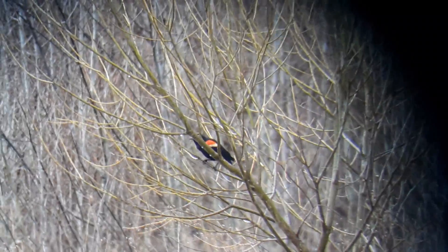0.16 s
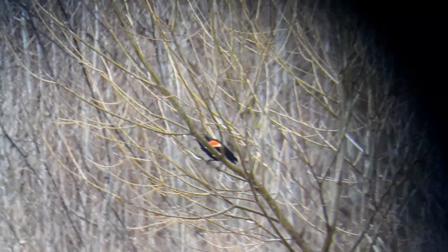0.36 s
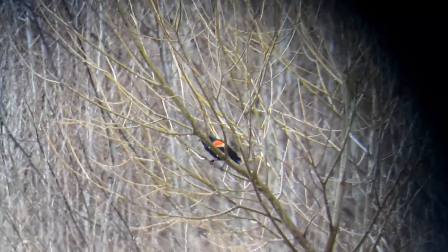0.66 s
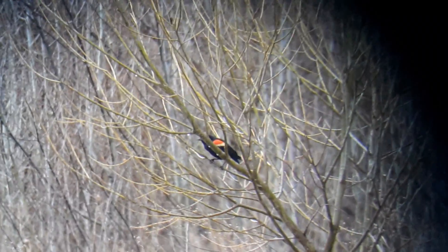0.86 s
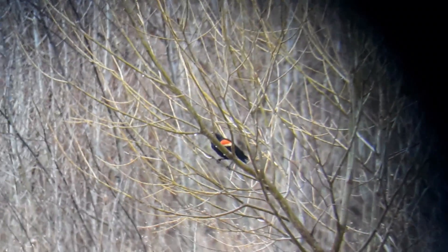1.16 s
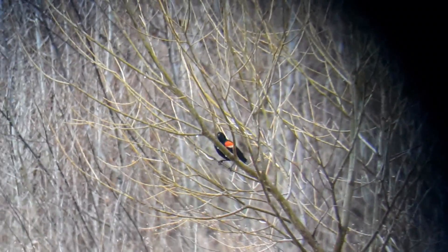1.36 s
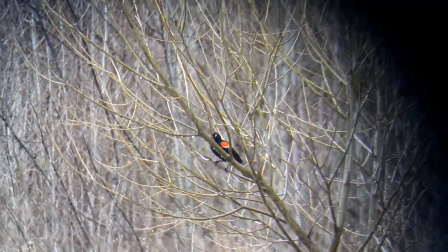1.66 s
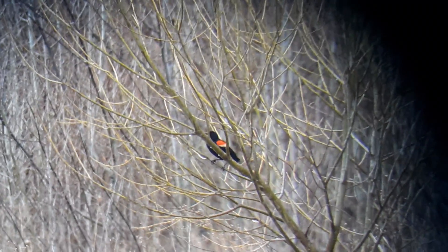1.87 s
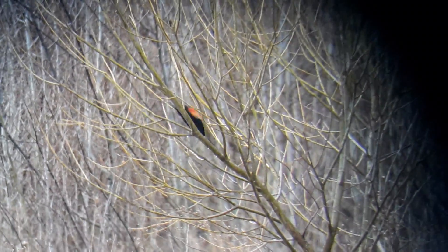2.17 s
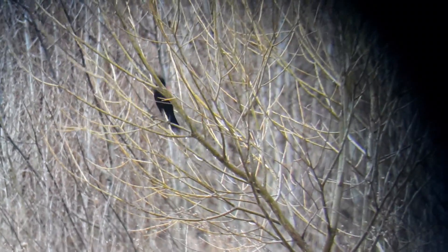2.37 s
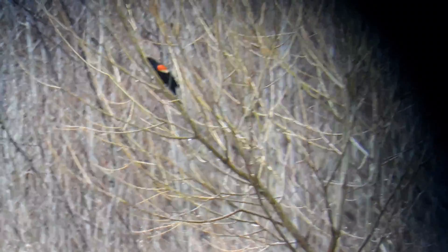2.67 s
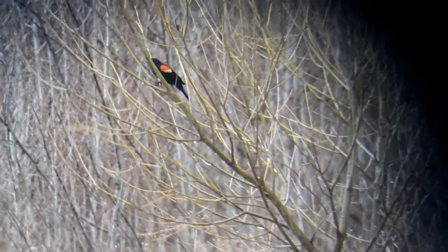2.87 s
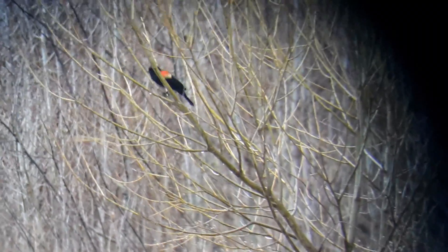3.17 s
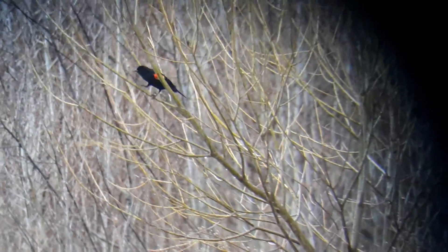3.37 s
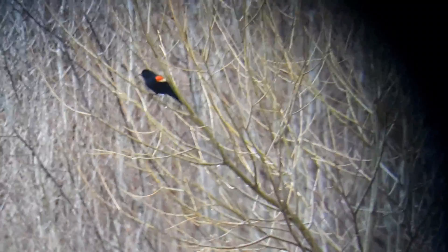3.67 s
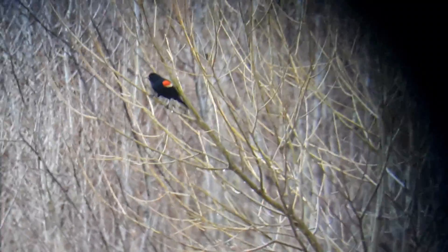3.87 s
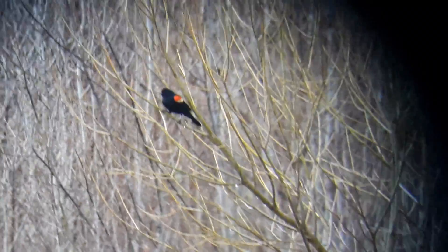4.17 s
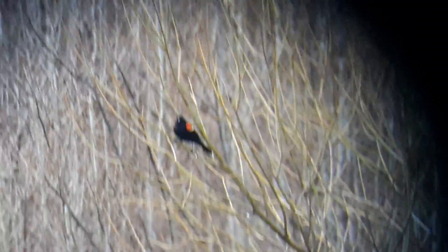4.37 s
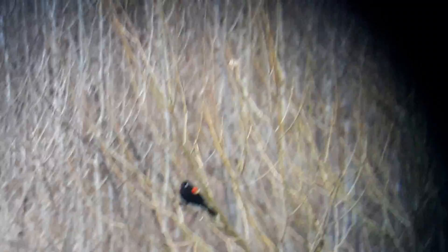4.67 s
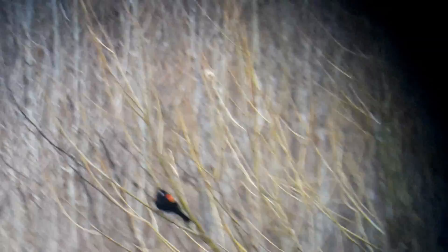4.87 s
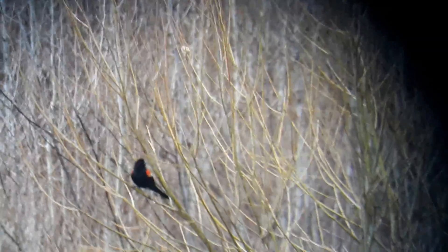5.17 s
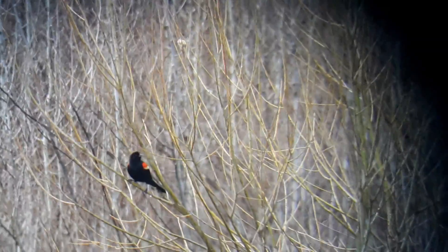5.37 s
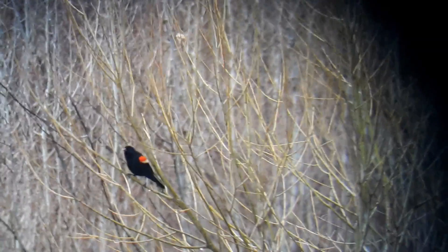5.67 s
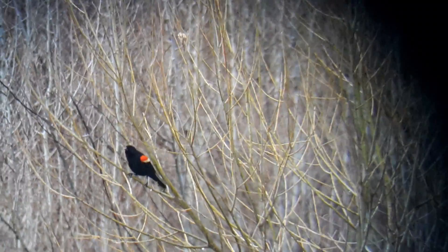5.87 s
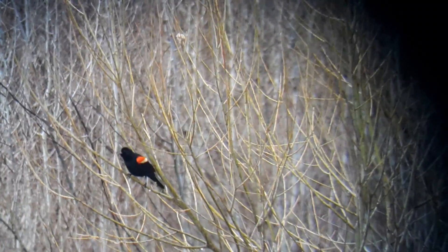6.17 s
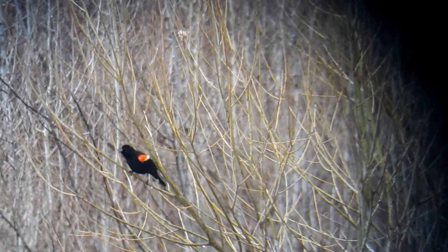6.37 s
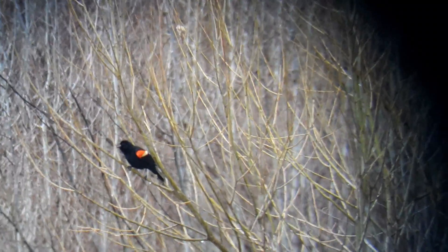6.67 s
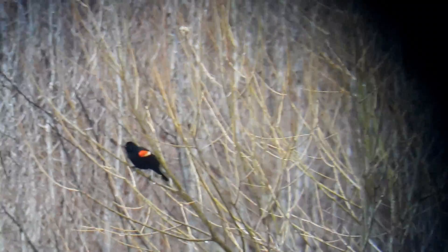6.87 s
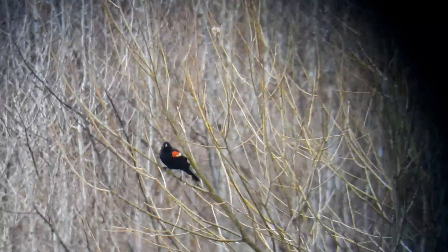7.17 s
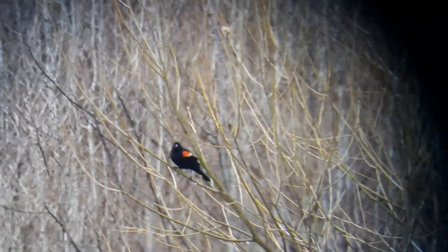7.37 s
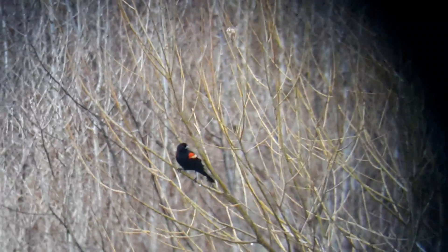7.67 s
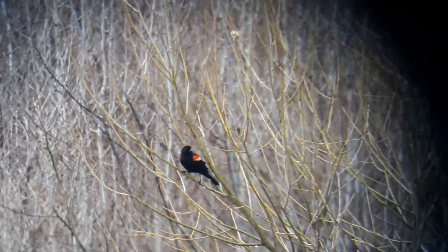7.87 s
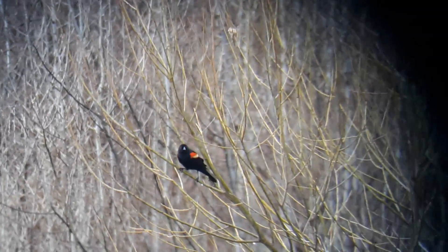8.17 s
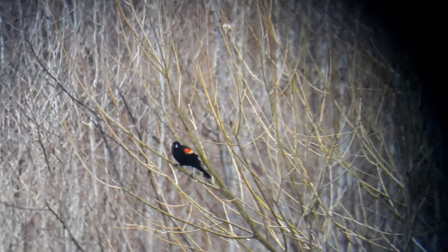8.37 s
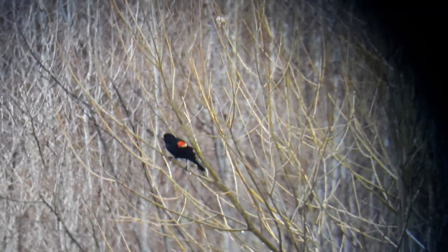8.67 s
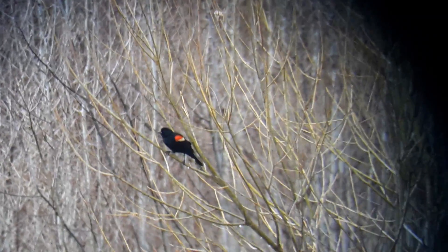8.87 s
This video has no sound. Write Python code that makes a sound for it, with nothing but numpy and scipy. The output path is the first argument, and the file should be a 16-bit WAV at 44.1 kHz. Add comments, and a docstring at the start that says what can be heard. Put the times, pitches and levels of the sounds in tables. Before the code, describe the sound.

Blackbirds sing short whistled notes and buzzy trills over a constant high-pitched whine, while a hand occasionally knocks the microphone.

```python
"""Blackbirds by a marsh

Red-winged blackbirds sing in bare trees: a few whistled notes, then a long trill made by both sides of
the syrinx, a bird's voice box. Chucks, thin whistles and a small songbird's ticking pass between songs.
Under it all lie a low rumble, a faint hiss and a steady whine, likely a far chorus of peeper frogs.
The hand-held microphone is bumped a few times, and its left side is shaded from the birds."""
import sys
import numpy as np
from scipy import signal
from scipy.fft import rfft, irfft, next_fast_len
from scipy.io import wavfile

SR = 44100
rng = np.random.default_rng(int(sys.argv[2]) if len(sys.argv) > 2 else 0)


def wrap_up_sound(samples):
    """Save the sound to the file named by the first command line argument, as 16-bit audio."""
    columns = np.atleast_2d(samples).T
    # keep every value between -1 and 1, then stretch to whole-number steps
    tamed = np.clip(columns, -1, 1)
    steps = np.round(tamed * 32767).astype(np.int16)
    wavfile.write(sys.argv[1], SR, steps)


N = 397341
TIME = np.arange(N) / SR

# Levels in these tables are starting points: filters and the mix change them later.
# The steady whine's tone. Each row: frequency in Hz, left and right level in dB.
WHINE_SPECTRUM = [(2110, -118, -116), (2230, -104, -102), (2466, -90.5, -86.5), (2622, -81, -78.5),
                  (2718, -74.5, -71.5), (2805, -86.5, -70), (3033, -81, -77), (3057, -104, -82.5),
                  (3360, -113, -108), (3650, -130, -125)]
# Level of the steady whine over time, with a brief rise during the loud trill.
# Each row: time in seconds, level in dB.
WHINE_LEVELS = [(0.0, -52), (1.93, -52), (2.28, -54), (2.53, -49.5), (2.8, -54), (4.86, -50.5),
                (4.89, -47.5), (5.34, -54.5), (5.39, -52), (8.05, -50.5), (8.65, -54), (9.0, -51.5)]
# The background noise's tone. Each row: frequency in Hz, left and right level in dB.
BACKGROUND_SPECTRUM = [(26.1, -95.5, -97.5), (85, -77.5, -75.5), (149, -81.5, -82), (217, -90, -89),
                       (372, -91, -89), (770, -100, -95.5), (1380, -109, -107), (2340, -109, -107),
                       (4100, -115, -109), (4800, -123, -117), (5900, -130, -128), (8460, -133, -134),
                       (10200, -121, -121), (12000, -118, -118), (15900, -121, -121)]
# Slow level changes of a low rumble and of a faint high background hiss.
# Each row: time in seconds, rumble in dB, hiss in dB.
BACKGROUND_LEVELS = [(0.0, -58.5, -80), (0.53, -58.5, -83.5), (2.58, -60.5, -84), (2.83, -61.5, -83.5),
                     (3.96, -59, -82), (4.23, -59, -82), (4.79, -58, -78), (5.94, -60.5, -84.5),
                     (6.74, -56.5, -78.5), (9.0, -61, -84.5)]
# Trills. Each row: start and length in seconds, kind, pulses per second, lower and upper voice in dB.
BLACKBIRD_TRILLS = [(-.2, 0.54, "buzz", 85, -72.5, -72), (-.1, 0.97, "purr", 25.6, -82.5, -77),
                    (1.901, 0.082, "buzz", 85, -75, -84), (2.595, 0.54, "buzz", 81.2, -67.5, -68),
                    (3.102, 0.66, "purr", 25.44, -73, -78.5), (4.296, .13, "rasp", 201.6, -65, -56),
                    (4.494, 0.555, "rattle", 47.8, -55, -44.5), (5.968, 1, "purr", 26.13, -76, -76),
                    (6.585, 0.51, "churr", 48.1, -63.5, -68.5), (7.529, .47, "buzz", 89, -52, -61),
                    (8.101, 0.53, "purr", 26.1, -73, -74.5)]
# The lower and upper voice of each kind. Each row: flutters per pulse, centre pitch in Hz,
# sweep in Hz, flutter size in Hz, about half of a pulse's level swing in dB.
TRILL_VOICES = {"rattle": [(7, 3450, 430, 520, 1.5), (6, 5000, 720, 140, 10.5)],
                "churr": [(4, 3230, 380, 130, 5.5), (2, 4700, 510, 446, 2)],
                "buzz": [(2, 3450, 380, 665, 2.5), (2, 4950, 130, 140, 1)],
                "purr": [(6, 3300, 300, 650, 1.5), (2, 5060, 65, 120, 1)],
                "rasp": [(1, 3600, 150, 360, 10.5), (1, 4920, 50, 88, 0.5)]}
# The beak favours the middle of a trill. Each row: frequency in Hz, gain in dB.
BEAK_FILTER = [(3200, 5), (3900, 2.5), (4280, -2), (4600, 6.5), (5600, -7), (6050, -18), (6600, 0),
               (7300, -39)]
# Runs of chirps. Each row: start in seconds, count, spacing in seconds, level in dB.
RISING_RUNS = [(.187, 3, 0.032, -65.5), (.581, 4, 0.031, -67), (2.935, 5, 0.022, -69),
               (5.207, 3, .026, -65), (5.679, 3, .022, -69)]
# Sharp chips. Each row: start in seconds, level in dB.
SHARP_CHIPS = [(.305, -61.5), (3.185, -56)]
# A chip's voice, laid out like one trill voice.
CHIP_SHAPE = (2, 4600, 350, 580, 1.8)
# The small songbird's songs. Each row: start in seconds, count, spacing in seconds, level in dB.
SONGBIRD_SONGS = [(.957, 7, .129, -71.5), (6.084, 6, .134, -78.5)]
# Its syllable: a tick, a falling note, a rising answer.
# Each row: delay and length in seconds, start, middle and end pitch in Hz, level in dB.
SONGBIRD_SYLLABLE = [(0, 0.0058, 5580, 6490, 7770, 4.5), (0.043, 0.033, 4605, 4230, 4080, -1.5),
                     (.08, .016, 3350, 3650, 4000, -8.5)]
# Whistles. Each row: start and length in seconds, middle pitch and fall in Hz, level in dB.
THIN_WHISTLES = [(1.714, 0.12, 1957, -34, -78.5), (1.997, .12, 5970, 591.5, -82.5),
                 (2.138, 0.17, 5530, 501.5, -81), (2.863, .03, 5700, 347, -79.5),
                 (3.26, 0.11, 4430, 199, -72.5), (3.651, .11, 4420, 197.5, -65),
                 (3.762, .096, 4605, 111, -69), (3.875, 0.2, 1208, 59, -70.5),
                 (4.078, 0.11, 4470, 173, -64), (4.146, 0.071, 4640, 120, -65.5),
                 (4.3, 0.15, 1540, -60.5, -74.5), (4.69, .13, 7400, 300, -89.5),
                 (5.905, .07, 2275, 97, -70), (8.098, 0.065, 4580, 139, -71),
                 (8.464, 0.074, 4470, 165, -66.5), (8.524, 0.078, 4500, 106, -73),
                 (8.758, 0.1, 4370, -4, -69), (8.935, .1, 4570, 151, -70)]
# Chucks. Each row: start in seconds, level in dB.
CHUCK_CALLS = [(2.343, -66.5), (4.049, -59.5), (6.47, -57), (8.704, -64)]
# A chuck's start, middle and end pitch in Hz.
CHUCK_PITCHES = (1540, 1787, 1550)
# The levels of its first four harmonics (multiples of the pitch) in dB.
CHUCK_HARMONICS = (-32.5, -0.5, -8, -37)
# The notes that open a song. Each row: start and length in seconds, start and end pitch in Hz, buzz
# depth as a share of the pitch, lowest tone in dB, overtones in dB, step per overtone in dB.
SONG_NOTES = [(2.478, 0.12, 1638, 1715, 0.04, -89, -54, -17),
              (3.151, 0.069, 1435, 1577, 0.07, -69, -59.5, -13),
              (4.207, 0.035, 2290, 2060, 0.06, -50.5, -73, 3),
              (4.291, .135, 2522, 2554, 0.01, -62, -51, -4), (4.3, 0.15, 1660, 1630, .04, -79, -59, -5),
              (4.45, .023, 1970, 1810, .04, -56.5, -67.5, 5.5),
              (4.488, 0.021, 1620, 1740, 0, -81.5, -53, -4.5),
              (6.301, 0.065, 2380, 2427, 0.05, -48.5, -89, -1),
              (6.392, 0.17, 2060, 2195, 0.01, -55, -73.5, -1.5),
              (6.527, 0.051, 1864, 1220, 0.2, -62, -63, -15), (7.182, .075, 1457, 1660, 0, -52, -78, -2),
              (7.257, 0.11, 1635, 1675, 0.02, -70, -61.5, 2.5),
              (7.455, 0.016, 2300, 2127, 0.05, -44.5, -66.5, 3),
              (7.477, 0.044, 2360, 2540, .03, -54, -56.5, -14),
              (7.661, 0.081, 1460, 1670, 0.06, -63.5, -62, -17),
              (7.998, 0.044, 2470, 2575, 0.01, -63, -63, -1)]
# What the throat passes of the overtones. Each row: frequency in Hz, gain in dB.
THROAT_FILTER = [(2900, 4.5), (3350, -3.5), (3750, -7.5), (4300, -17.5), (5050, 1.5), (5650, -7),
                 (6300, -4.5), (6700, -9), (7600, -33)]
# Shade on the microphone's left side. Each row: frequency in Hz, gain in dB.
LEFT_SHADE = [(1500, -8.5), (2700, -6), (3600, -19.5), (4200, -17.5), (5100, -19), (6500, -12.5),
              (7600, -35)]
# Hand bumps. Each row: start in seconds, peak in dB, left minus right in dB, treble cutoff in Hz.
HAND_BUMPS = [(3.667, -25.5, 28, 487), (4.477, -41.5, 26, 487), (5.45, -43.5, 12, 503),
              (6.858, -45.5, 12, 500), (6.891, -47, 19, 505), (6.932, -40, 21, 504)]
# How the microphone's case rings. Each row: pitch in Hz, level in dB, seconds to fade by 60 dB.
CASE_RINGS = [(85, -20, 1), (129.8, 2.5, 0.16), (162, 1.5, 0.13), (229, 0, 0.12), (379, -2.5, 0.044),
              (562, -5, 0.061), (845, -14.5, 0.032)]


def undb(db):
    """Turn decibels into a gain."""
    return 10 ** (np.asarray(db) / 20)


def unit(x):
    """Scale to an average (rms) level of 1."""
    return x / np.sqrt(np.mean(x ** 2) + 1e-20)


def add(out, start, x):
    """Mix x into out from a start time on."""
    i = int(start * SR)
    a, b = max(i, 0), min(i + x.shape[-1], N)
    out[..., a:b] += x[..., a - i:b - i]


def colour(x, hz, db):
    """Filter by a curve drawn through a few points."""
    size = next_fast_len(N)
    f = np.maximum(np.fft.rfftfreq(size, 1 / SR), 1)
    gain = undb(np.interp(np.log(f), np.log(hz), db))
    return irfft(rfft(x, size) * gain, size)[:N]


def walk(t, rate):
    """A random drift of size about 1 that turns rate times a second."""
    knots = rng.standard_normal(1024)
    return np.interp(t * rate % 1023, np.arange(1024), knots)


def fade(t, rise, fall):
    """Fade in and out; rise and fall are in seconds."""
    fade_in = np.sin(np.pi / 2 * np.clip(t / rise, 0, 1))
    return fade_in * np.sin(np.pi / 2 * np.clip((t[-1] - t) / fall, 0, 1))


def decay(t, t60):
    """Die away by 60 dB in t60 seconds."""
    return np.exp(-np.log(1000) * t / t60)


def glide(length, pitches):
    """Times and a pitch curve through start, middle and end."""
    t = np.arange(int(length * SR)) / SR
    return t, np.polyval(np.polyfit([0, .5, 1], pitches, 2), t / length)


def turn(hz):
    """The phase of a moving pitch."""
    return 2 * np.pi * np.cumsum(hz) / SR


def level_curves(curve):
    """Each level column over time, in dB from its median."""
    times, *columns = np.transpose(curve)
    return [np.interp(TIME, times, c - np.median(c)) for c in columns]


def white():
    """Plain noise."""
    return rng.standard_normal(N)


def stereo(sound, spectrum, shared, apart_hz, lag_s=0):
    """Two sides hear a sound, each with its own tone, and less and less alike above apart_hz."""
    hz, *sides_db = np.transpose(spectrum)
    alike = np.clip(shared / (1 + (hz / apart_hz) ** 2), 1e-4, .99)
    common = sound()
    arrivals = np.roll(common, int(lag_s * SR)), common
    sides = [colour(x, hz, db + 10 * np.log10(alike)) + colour(sound(), hz, db + 10 * np.log10(1 - alike))
             for x, db in zip(arrivals, sides_db)]
    return np.sqrt(SR / 2) * np.array(sides)


def peeps(count=300, single_db=-18, blur_db=-4):
    """Short rising peeps; noise stands for the many so far off that they blur together."""
    out = np.zeros(N)
    for when, pitch, size in rng.random((count, 3)):
        t, hz = glide(0.1005, (2520 + 480 * pitch) * np.array([.95, 1, 1.03]))
        add(out, when * (N / SR), np.sin(turn(hz)) * fade(t, 0.033, 0.042) * undb(9 * size))
    return undb(single_db) * unit(out) + undb(blur_db) * white()


def steady_whine():
    """Far peeps, likely frogs, merge into a whine."""
    level_db, = level_curves(WHINE_LEVELS)
    return stereo(peeps, WHINE_SPECTRUM, shared=0.43, apart_hz=12200, lag_s=-.00039) * undb(level_db)


def rumble_and_hiss(split_hz=1500):
    """A low rumble and a faint high background hiss, each drifting in level."""
    rumble_db, hiss_db = level_curves(BACKGROUND_LEVELS)
    noise = stereo(white, BACKGROUND_SPECTRUM, shared=1.0, apart_hz=176)
    rumble = signal.sosfiltfilt(signal.butter(2, split_hz, fs=SR, output="sos"), noise)
    hiss = noise - rumble
    return rumble * undb(rumble_db + 0.79 * walk(TIME, 9.1)) + hiss * undb(hiss_db + 0.7 * walk(TIME, 3.2))


def trill_voice(length, rate, shape, jitter_hz=130, overtone_db=-18, wander=.06):
    """One side of the syrinx sweeps once a pulse and flutters on top; early pulses are hurried and soft."""
    flutters, centre_hz, sweep_hz, flutter_hz, depth_db = shape
    t = np.arange(int(length * SR)) / SR
    hurry = 1 + .17 * np.exp(-(t / .15) ** 2)
    cycle = turn(rate * hurry) - 2 * np.pi * .94 + wander * walk(t, rate)
    flutter = flutters * cycle
    # the pitch climbs, plunges and recovers; the voice is loudest as the plunge begins
    pulse = np.exp(1.5 * (np.cos(cycle + .25) - 1))
    sweep = -np.sin(cycle) * np.exp(3.5 * (np.cos(cycle) - 1))
    swing = sweep_hz * sweep / sweep.max() + flutter_hz * np.cos(flutter)
    swing *= 1 + wander * walk(t, rate)
    # wide sweeps are less steady than narrow ones
    hz = centre_hz + swing + jitter_hz * np.tanh((sweep_hz + flutter_hz) / 600) * walk(t, 500)
    effort_db = 2 * np.sin(np.pi * (t / length) ** 1.4) + 1.6 * walk(t, 40)
    loudness = undb(2 * depth_db * pulse - 2.6 * np.sin(flutter) + effort_db)
    voice = np.sin(turn(hz)) + undb(overtone_db) * np.sin(2 * turn(hz))
    return unit(voice * loudness * fade(t, 0.032, 0.025))


def trills():
    """Both sides of a blackbird's syrinx sing at once, one low and one high."""
    out = np.zeros(N)
    for start, length, kind, rate, *levels_db in BLACKBIRD_TRILLS:
        for shape, db in zip(TRILL_VOICES[kind], levels_db):
            add(out, start, undb(db) * trill_voice(length, rate, shape))
    return out


def whistle(length, pitches, db, waver=.004, scatter_db=2.5):
    """One nearly pure tone, its level partly left to chance."""
    t, hz = glide(length, pitches)
    tone = np.sin(turn(hz * (1 + waver * walk(t, 150)))) * fade(t, .48 * length, .4 * length)
    return unit(tone) * undb(db + scatter_db * rng.standard_normal())


def series_call(length, pitches, db, k, count, arch_db=3, vary_db=2):
    """Call k of a series that swells in the middle; no two calls are quite alike."""
    swell_db = arch_db * (np.sin(np.pi * (k + .5) / count) - 2 / np.pi)
    varied_hz = np.array(pitches) * (1 + .014 * rng.standard_normal(size=3))
    return whistle(length, varied_hz, db + swell_db + vary_db * rng.standard_normal())


def chirp_runs(pitches_hz=(4500, 5000, 5730)):
    """Quick runs of tiny rising whistles."""
    out = np.zeros(N)
    for start, count, spacing, db in RISING_RUNS:
        for k in range(count):
            add(out, start + k * spacing, series_call(0.65 * spacing, pitches_hz, db, k, count))
    return out


def chips():
    """Short harsh bursts from one side of the syrinx."""
    out = np.zeros(N)
    for start, db in SHARP_CHIPS:
        add(out, start, undb(db) * trill_voice(length=0.03, rate=91, shape=CHIP_SHAPE))
    return out


def note(length, pitches, buzz_hz, depth, harmonics_db, waver=.002):
    """A gliding note with harmonics; a fast buzz of the syrinx shakes its pitch."""
    t, hz = glide(length, pitches)
    buzz = np.sin(2 * np.pi * buzz_hz * t)
    phase = turn(hz * (1 + depth * buzz + waver * walk(t, 160)))
    tone = sum(np.sqrt(2) * undb(db) * np.sin(k * phase) for k, db in enumerate(harmonics_db, 1))
    # a deep buzz also chops the level; a shallow one leaves a clean whistle
    chop = 1 + 0.25 * np.tanh(depth / 0.06) * buzz
    return tone * chop * fade(t, .3 * length, .22 * length)


def songbird_buzz(start=.846, length=.08, hz=6630):
    """A high buzzy note opens the small songbird's first song."""
    out = np.zeros(N)
    add(out, start, note(length, (hz, hz, hz), buzz_hz=212.5, depth=0.047, harmonics_db=[-54.5]))
    return out


def songbird_ticks():
    """The small songbird repeats a syllable of three brief whistles."""
    out = np.zeros(N)
    for start, count, spacing, db in SONGBIRD_SONGS:
        for k in range(count):
            for delay, length, *pitches, part_db in SONGBIRD_SYLLABLE:
                add(out, start + k * spacing + delay, series_call(length, pitches, db + part_db, k, count))
    return out


def thin_whistles():
    """Single whistles, most of them sliding down."""
    out = np.zeros(N)
    for start, length, hz, fall_hz, db in THIN_WHISTLES:
        add(out, start, whistle(length, (hz + .6 * fall_hz, hz, hz - .4 * fall_hz), db))
    return out


def chucks(length=.044):
    """Short, slightly buzzy calls that rise and fall in pitch."""
    out = np.zeros(N)
    for start, db in CHUCK_CALLS:
        chuck = note(length, CHUCK_PITCHES, buzz_hz=230, depth=.02, harmonics_db=CHUCK_HARMONICS)
        add(out, start, undb(db) * chuck)
    return out


def opening_notes(buzz_hz=180):
    """A blackbird's whistled notes; the throat shapes their three overtones."""
    out, steps = np.zeros(N), np.arange(3)
    for start, length, first_hz, last_hz, depth, db, overtones_db, tilt_db in SONG_NOTES:
        middle_hz = first_hz + .6 * (last_hz - first_hz)
        throat_db = np.interp(middle_hz * (steps + 2), *np.transpose(THROAT_FILTER))
        overtones = overtones_db + tilt_db * steps + throat_db
        add(out, start, note(length, (first_hz, middle_hz, last_hz), buzz_hz, depth, [db, *overtones]))
    return out


def hand_bumps(scuff_db=-24):
    """Soft knocks ring the microphone's case; skin scuffs a little on it."""
    out, t = np.zeros((2, N)), np.arange(SR // 2) / SR
    for start, db, pan_db, cutoff_hz in HAND_BUMPS:
        ring = sum((-1) ** k * undb(ring_db) * np.sin(2 * np.pi * hz * t) * decay(t, t60)
                   for k, (hz, ring_db, t60) in enumerate(CASE_RINGS))
        scuff = undb(scuff_db) * rng.standard_normal(len(t)) * decay(t, 0.062)
        knock = signal.sosfilt(signal.butter(2, cutoff_hz, fs=SR, output="sos"), ring + scuff)
        sides = undb(np.array([[pan_db], [-pan_db]]) / 2)
        add(out, start, undb(db) * knock / np.abs(knock).max() * sides / sides.mean())
    return out


def grip_creak(start=6.872, squeak_hz=590, slip_start=6.892, click_hz=1800):
    """The grip creaks briefly and slips with a small click, louder on the left."""
    out, t = np.zeros(N), np.arange(int(.045 * SR)) / SR
    squeak = np.sin(turn(squeak_hz * (1 + 0.046 * walk(t, 260))))
    click = np.sin(2 * np.pi * click_hz * t) * decay(t, .009)
    add(out, start, undb(-49) * squeak * fade(t, 0.002, 0.019))
    add(out, slip_start, undb(-44) * click * fade(t, 0.00052, .01))
    return out * undb([[0], [-4]])


def ground_bounce(x, echo_db=-5):
    """An echo off the ground, a few ever-changing milliseconds late, roughens the sweeps."""
    delay_s = .004 + .0004 * walk(TIME, 30)
    echo = np.interp(TIME - delay_s, TIME, x)
    return (x + undb(echo_db) * echo) / np.hypot(1, undb(echo_db))


def woods(x, twigs_db, trees_db, shade=1.0, twigs_t60=0.049, trees_t60=1.28):
    """Near twigs scatter the sound at once, far trunks add a long tail; the left side lies in shade."""
    t = np.arange(int(1.5 * SR)) / SR
    sides = []
    for _ in range(2):
        response = (t == 0).astype(float)  # the direct sound
        for db, t60 in ((twigs_db, twigs_t60), (trees_db, trees_t60)):
            echoes = rng.standard_normal(len(t)) * decay(t, t60) * (1 - np.exp(-t / 0.017))
            response += undb(db) * echoes / np.linalg.norm(echoes)
        sides.append(signal.fftconvolve(x, response)[:N])
    hz, db = np.transpose(LEFT_SHADE)
    return np.array([colour(sides[0], hz, shade * db), sides[1]])


def scene():
    """Whine, rumble and hiss, birds among the trees and the hand on the microphone."""
    background = steady_whine() + rumble_and_hiss()
    notes = woods(opening_notes() + chucks() + songbird_buzz(), twigs_db=-5, trees_db=-17)
    from_beak = colour(trills() + chips(), *np.transpose(BEAK_FILTER))
    songs = woods(ground_bounce(from_beak), twigs_db=-6, trees_db=-15)
    calls = woods(thin_whistles() + chirp_runs() + songbird_ticks(), twigs_db=-5, trees_db=-9.5, shade=.7)
    birds = undb(-1.6) * notes + undb(-1.3) * songs + undb(1.7) * calls
    return background + birds + hand_bumps() + grip_creak()


def record(dry, top_hz=15700):
    """Cut away the highest treble."""
    return signal.sosfilt(signal.ellip(10, .2, 70, top_hz, fs=SR, output="sos"), dry)


dry = scene()
out = record(dry)
wrap_up_sound(out)
```